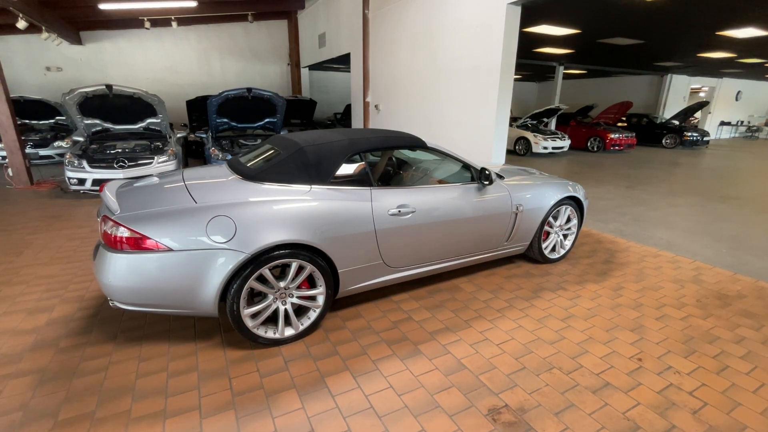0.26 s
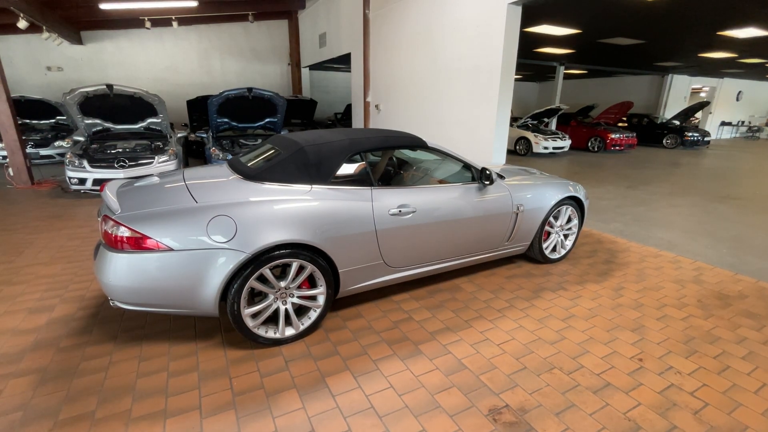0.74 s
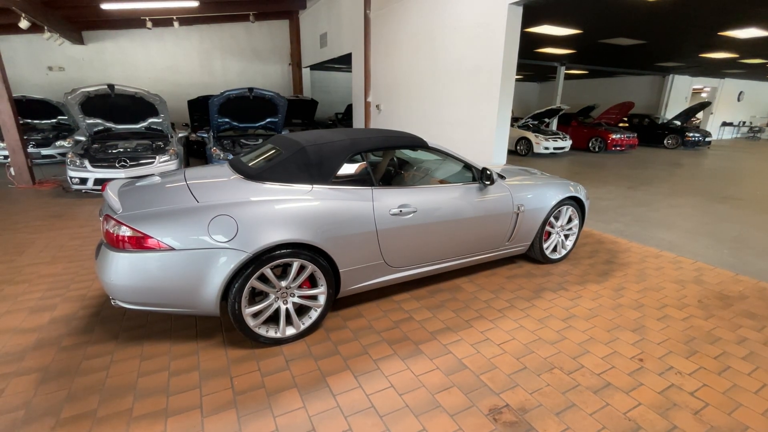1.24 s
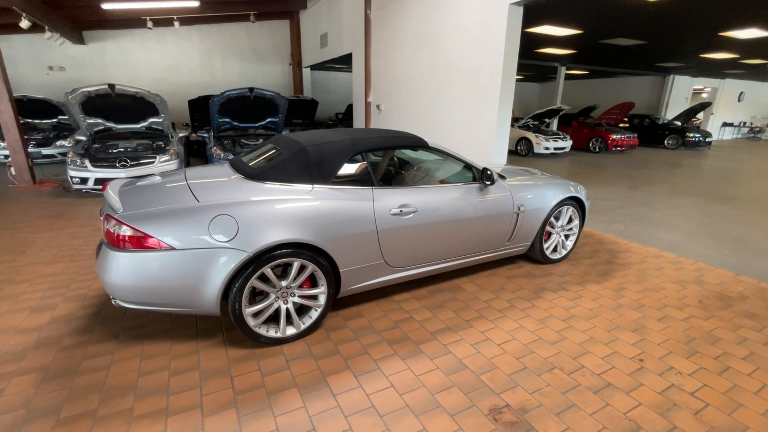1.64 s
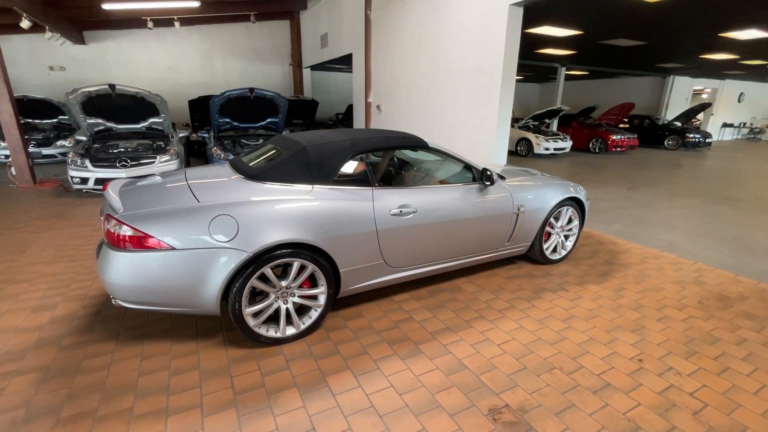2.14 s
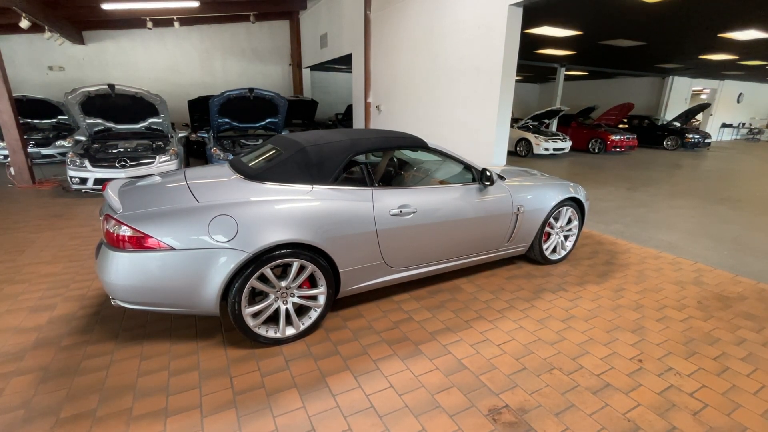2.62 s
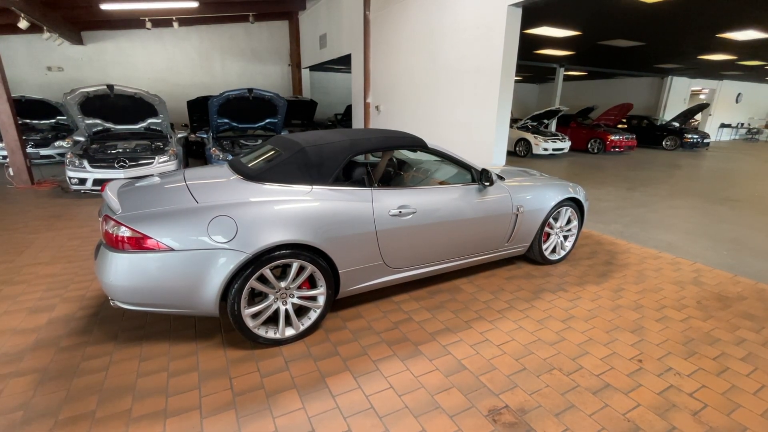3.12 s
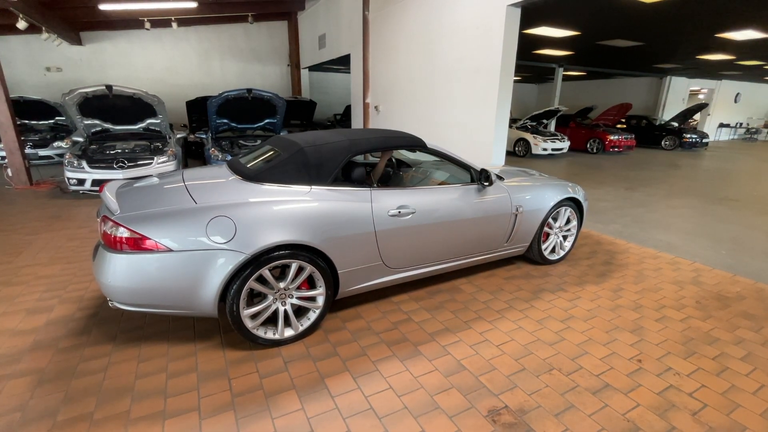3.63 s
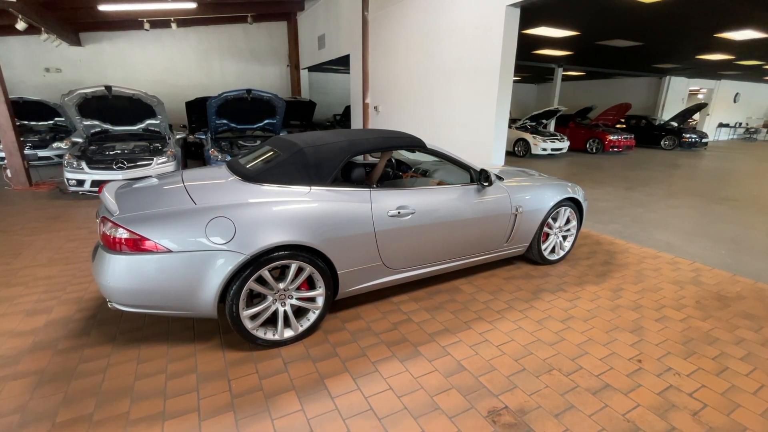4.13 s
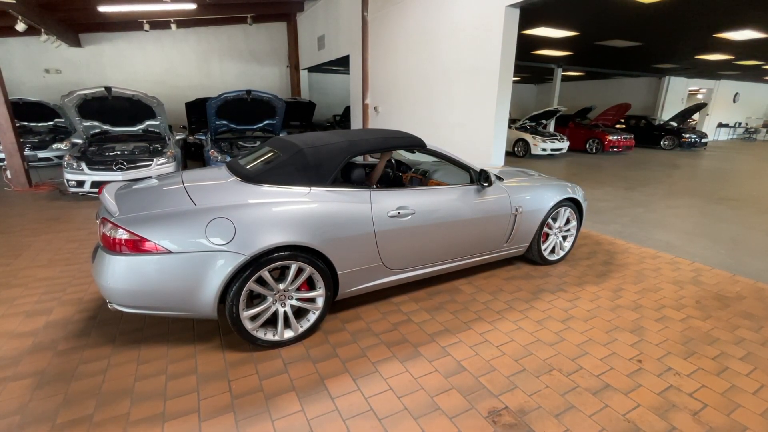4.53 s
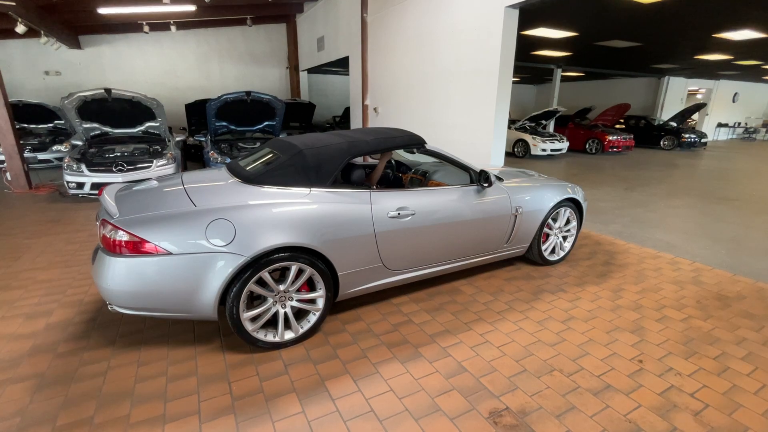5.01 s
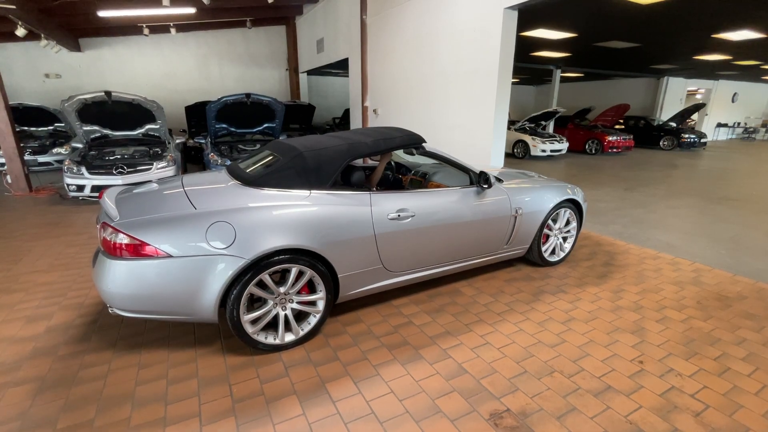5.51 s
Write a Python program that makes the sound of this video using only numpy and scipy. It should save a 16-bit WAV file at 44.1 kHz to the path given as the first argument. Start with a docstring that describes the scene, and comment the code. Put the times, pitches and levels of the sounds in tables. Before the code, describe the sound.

A convertible stands idling in a large reverberant showroom, picked up in stereo from a few metres away. From the start its eight-cylinder engine gives a deep droning, lumpy throb with fluttering exhaust puffs, while belts and pulleys whine in wavering spells. An electric roof motor hums low and steady with its octave, and a fuel pump sings thinly higher up. Soft padded knocks come near 1.8 s. From about 1.8 to 3 s the idle sinks gently and settles slower and more chugging, the main belt whine fading away. A dull metallic latch clunk with a quick rebound lands at about 2.5 s, among small rubs. More muffled knocks follow near 3.2, 3.8, 4.5 and 4.6 s, the one just before 3.9 s having a low thud. Short pulley chirps return around 2.8, 3.8 and 5.4 s. Airy fan rush and low hall rumble continue to the end at 5.8 s.

```python
"""In a large showroom a V8 convertible idles while its electric roof starts to fold.
The uneven idle throbs from firing orders and exhaust resonances, sinks at about two seconds and settles lower.
Belt-driven parts whine at fixed ratios to it; the roof motor hums with its octave and the fuel pump sings.
A latch clunks by ringing the roof frame, roof and windows knock softly as short noise bursts,
and behind them coloured noise gives the rush of air and the rumble of the hall, heard at two microphones."""
import sys
import numpy as np
from scipy import signal
from scipy.fft import rfft, irfft
from scipy.io import wavfile
from scipy.ndimage import uniform_filter1d

SR = 44100
rng = np.random.default_rng(int(sys.argv[2]) if len(sys.argv) > 2 else 0)


def digitize_waveform(pressure):
    """Quantize a signal to 16-bit integers and store it at the path in sys.argv[1].

    Rows of a 2-D input are taken as channels; values are limited to [-1, 1].
    """
    field = np.atleast_2d(pressure).T
    bounded = np.clip(field, -1, 1)
    quanta = np.round(bounded * 32767).astype(np.int16)
    wavfile.write(sys.argv[1], SR, quanta)


N = 254016
TIME = np.arange(N) / SR   # seconds
HZ = np.maximum(np.arange(N // 2 + 1) * SR / N, 1)   # frequencies of the spectrum


# How roughly the engine runs.
# Each row: time [s], gain of the throb, gas flutter and puffs [dB].
ROUGHNESS = [(0, 1.5), (0.8, -1), (1.4, 1.5), (1.9, 2), (2.6, 1.5), (3.3, 0), (4.3, -1.6), (4.9, -0.5),
             (5.5, 1.5), (5.76, 1)]


def engine(firings, rate, fast):
    """Firing orders, boom, cycle throb, puffs and gas flutter, with a chug when the idle is slow."""
    slow = 1 - fast
    first, second, third = firing_orders(firings, rate, fast)
    third_sway = lope(firings, once=0, twice=0.2 * fast, rough_db=0.4, late=0.14)
    chug = lope(firings, once=0.17 * slow ** 2, twice=0.25 * slow ** 2, rough_db=0.3, late=0.66)
    drone = first + third_sway * third + chug * (second + low_puff(slow))
    uneven = at_idle(fast, fast_db=-44, slow_db=-42) * throb(firings)
    roughness_db, = in_time(ROUGHNESS)
    rough = from_db(roughness_db) * (uneven + gas_flutter(firings, fast) + puffs(firings, fast))
    return drone + boom(firings, fast) + rough


# Drone of the exhaust, before the hall's standing waves.
# Each row: multiple of the firing rate, level at fast idle [dB], level at slow idle [dB].
DRONE = [(1, -42.5, -43.5), (2, -36, -41.5), (3, -35.5, -53)]


def firing_orders(firings, rate, fast):
    """Lines at whole multiples of the firing rate, lifted or cancelled by the hall as they glide."""
    orders = []
    for k, fast_db, slow_db in DRONE:
        order = round(k)
        level = at_idle(fast, fast_db, slow_db) * standing_waves(order * rate)
        orders.append(level * tone(order * firings, scatter=0.091, per_s=3.0))
    return orders


# Standing waves of the hall, which lift or cancel a drone line gliding through them.
# Each row: centre [Hz], half width [Hz], gain at the centre [dB].
STANDING_WAVES = [(45, 4.0, 13.5), (87, 1.2, -9), (127.4, 2.4, 13), (131.1, 2.8, 12.5), (140, 2.2, 4)]


def standing_waves(hz):
    """Gain of the hall for a low line at this pitch."""
    return from_db(sum(db * np.exp(-((hz - centre) / width) ** 2) for centre, width, db in STANDING_WAVES))


def boom(firings, fast):
    """The sixth firing order, favoured by the exhaust, beats in step with the engine cycle."""
    beats = lope(firings, once=0.5 * fast, twice=0.45, rough_db=0.6, late=0.96)
    level = at_idle(fast, fast_db=-35.5, slow_db=-51.5)
    return level * tone(6 * firings, scatter=0.19, per_s=1.3) * beats


def low_puff(slow):
    """Low noise through one resonance (centre and width in Hz), growing as the idle slows."""
    return from_db(-45) * slow * noise(np.abs(resonance(70.3, width_hz=28)) ** 2)


def throb(firings, size=4096, count=100):
    """Eight cylinders burn unevenly: a slowly changing pattern repeats each cycle and rings in the exhaust."""
    pattern = np.zeros(N)
    for share in (0.8, drift(1.72), drift(3.3)):
        harmonics = np.exp(2j * np.pi * rng.random(count))   # equal strength, random phase
        cycle = irfft(np.append(0, harmonics), size)
        pattern += share * np.interp(firings / 8, np.arange(size) / size, cycle, period=1)
    pattern /= np.sqrt(uniform_filter1d(pattern ** 2, size=SR // 5))   # even power over 0.2 s
    through_exhaust = irfft(rfft(pattern) * (exhaust_colour() + from_db(-19.0)), N)
    return rms_one(hall(through_exhaust, wet_db=-2.0))


# Strong exhaust puffs, before the roughness gain.
# Each row: place in the engine cycle [cycles], ring [Hz], level at fast idle [dB], level at slow idle [dB].
PUFFS = [(0.54, 282, -48.5, -45), (0.92, 282, -49.5, -46), (0.58, 141, -47.5, -49.5)]
PUFF_RING_S, PUFF_SPREAD_DB = 0.009, 1.5


def puffs(firings, fast):
    """At the same places in every cycle a stronger puff of gas sets the exhaust ringing briefly."""
    cycle, out = cycles(firings), 0
    for place, hz, fast_db, slow_db in PUFFS:
        last_puff_s = np.interp(np.floor(cycle - place) + place, cycle, TIME)
        age = TIME - last_puff_s
        envelope = age * np.exp(-age / PUFF_RING_S)
        ring = envelope * np.sin(2 * np.pi * (hz * age + rng.random()))
        varied = ring * from_db(PUFF_SPREAD_DB * drift(10.6))
        out = out + at_idle(fast, fast_db, slow_db) * rms_one(varied)
    return out


def gas_flutter(firings, fast):
    """Turbulent exhaust gas: noise in the exhaust's colour, swelling with the engine cycle."""
    swells = lope(firings, once=0.11 * fast, twice=0.13, rough_db=1.5)
    return at_idle(fast, fast_db=-43.0, slow_db=-45.5) * noise(exhaust_colour()) * swells


# Exhaust and body resonances.
# Each row: centre [Hz], width of a single pass [Hz], gain [dB].
EXHAUST = [(66, 22, -8.5), (138.3, 36, -0.5), (281.3, 27, 0.5), (343, 157, -12.5)]


def exhaust_colour():
    """The exhaust's resonances, each applied twice so the valleys stay dark."""
    return sum(from_db(db) * np.abs(resonance(hz, width)) ** 2 for hz, width, db in EXHAUST)


def lope(firings, once, twice, rough_db, late=0):
    """Swells once and twice per cycle, as the two banks take uneven turns, no two alike; rms 1; late in cycles."""
    angle = 2 * np.pi * (cycles(firings) - late)
    swell = np.exp(once * np.cos(angle) + twice * np.cos(2 * angle))
    return rms_one(swell * from_db(rough_db * drift(21)))


FIRST_THROB_S = 0.053   # the engine cycle first swells here


def cycles(firings):
    """Engine cycles, of eight firings each, since the first throb."""
    return (firings - np.interp(FIRST_THROB_S, TIME, firings)) / 8


def at_idle(fast, fast_db, slow_db):
    """A gain that moves from its slow-idle to its fast-idle level with engine speed."""
    return from_db(slow_db + (fast_db - slow_db) * fast)


PULLEY_RATIO = 3.622   # mean pulley turns per firing
BELT_SLIP = 0.0025   # wavering of the pulley's speed (share)


def belt(firings, fast):
    """Pulleys and gears whine at fixed ratios to the crank; one slips, whines and sings out in spells."""
    pulley = unsteady(PULLEY_RATIO * firings, BELT_SLIP, per_s=14.4)
    return engine_overtones(firings, fast) + pulley_whine(pulley) + pulley_spells(pulley)


# Whines locked to the engine.
# Each row: multiple of the firing rate, level at fast idle [dB], level at slow idle [dB],
# wavering share, speed of the wavering [Hz].
OVERTONES = [(3.97, -54, -54, 0.45, 3.9), (5, -54.5, -63, 0.73, 3.1), (6.605, -64, -45.5, 0.59, 4.2),
             (6.955, -67, -51.5, 0.66, 8.4), (7.24, -50.5, -60.5, 0.44, 5.1), (8.48, -56.5, -47, 0.33, 2.1),
             (14.52, -61, -64, 1, 5), (25.6, -66, -59.5, 1, 15), (36.35, -55.5, -64, 1.1, 13),
             (52.2, -64.5, -70, 1.6, 22), (76.9, -60.5, -62, 2.2, 54)]


def engine_overtones(firings, fast):
    """Lines at fixed, mostly uneven multiples of the firing rate sink in pitch with the idle."""
    out = 0
    for k, fast_db, slow_db, scatter, blur_hz in OVERTONES:
        out = out + at_idle(fast, fast_db, slow_db) * tone(k * firings, scatter, per_s=blur_hz)
    return out


# The slipping pulley's main whine, which fades as the idle sinks.
# Each row: time [s], level [dB].
WHINE = [(0, -57), (0.33, -57), (0.42, -49), (1.12, -47.5), (1.2, -57), (1.3, -49), (1.52, -53),
         (1.63, -49.5), (1.78, -56), (1.92, -49), (2.14, -50), (2.22, -60), (3, -74)]


def pulley_whine(pulley):
    """The sixth overtone of the slipping pulley's turning rate."""
    whine_db, = in_time(WHINE)
    return from_db(whine_db) * tone(6 * pulley, scatter=0.36, per_s=18)


# Spells in which the pulley's other overtones sing.
# Each row: start [s], length [s], multiple of its turning rate, level [dB], wavering share.
SPELLS = [(0.0, 0.48, 2, -44, .5), (0.5, 1.2, 4, -55, .5), (0.4, 1.05, 10, -57, 1.8),
          (0.76, 0.18, 10, -53, 0.9), (1.2, 0.64, 2, -44, 0.58), (1.55, 0.28, 8, -54, 0.62),
          (2.72, 0.18, 7, -50, .4), (3.72, .28, 7, -52, 0.44), (4.999, 0.3, 7, -58, .5),
          (5.38, 0.17, 7, -50, .3)]
SPELL_FADE_S = 0.074


def pulley_spells(pulley):
    """Overtones of the pulley fade in and out, halfway up at the start and end of each spell."""
    out = 0
    for start, length, k, db, scatter in SPELLS:
        inside_s = np.minimum(TIME - start, start + length - TIME)
        swell = np.clip(0.5 + inside_s / SPELL_FADE_S, 0, 1)
        out = out + from_db(db) * swell * tone(round(k) * pulley, scatter, per_s=28)
    return out


# Roof motor.
# Each row: time [s], hum [Hz], level of the hum [dB], level of its octave [dB].
ROOF_MOTOR = [(0, 157, -49, -42.5), (1.3, 156.2, -45, -51.5), (2.7, 156, -42.5, -49),
              (4, 156.3, -47.5, -69), (5.76, 153.5, -47.5, -43.5)]


def roof_motor():
    """A hum and its octave, sagging slightly as the load grows."""
    hz, hum_db, octave_db = in_time(ROOF_MOTOR)
    turns = np.cumsum(hz) / SR
    hum = from_db(hum_db) * tone(turns, scatter=0.16, per_s=3.2)
    octave = from_db(octave_db) * tone(2 * turns, scatter=1.0, per_s=5.2)
    return hum + octave


# Overtones of the fuel pump.
# Each row: multiple of its turning rate, level [dB], wavering share.
PUMP = [(2, -49.5, 0.92), (4, -51, 0.51), (5, -59.5, 0.67), (6, -70.5, .6)]
PUMP_HZ, PUMP_SLIP = 384.35, 0.0028   # mean turns per second, wavering of the speed (share)


def fuel_pump():
    """A rough whine of unsteady speed, wavering in the hall."""
    turns = unsteady(PUMP_HZ * TIME, PUMP_SLIP, per_s=11.5)
    return sum(from_db(db) * tone(round(k) * turns, scatter, per_s=19) for k, db, scatter in PUMP)


# Contacts of the roof latch. Each row: time [s], level before the mode's own gain [dB].
LATCH = [(2.472, -39), (2.477, -34.5), (2.491, -43)]
# Modes of the roof frame. Each row: pitch [Hz], gain [dB], time to die away by 60 dB [s].
FRAME = [(476, -3, 0.1), (560, -1, 0.083), (680, -3, .05), (825, -1, .045), (1028, -11, .06),
         (1400, -12, .04), (2180, -12, .04)]


def latch():
    """The roof latch lets go with a clunk and a rebound; each contact rings the frame."""
    out = np.zeros(N)
    for s, db in LATCH:
        age = np.maximum(TIME - s, 0)
        for hz, mode_db, t60 in FRAME:
            strike_db = db + mode_db + rng.normal(0, 1)
            decay = from_db(strike_db - 60 * age / t60)
            out += rng.choice([-1, 1]) * decay * np.sin(2 * np.pi * hz * age)
    return hall(out, wet_db=-6)


# Soft knocks and rubs of roof and windows.
# Each row: time of the peak [s], level at the peak [dB], centre [Hz], time constant of the decay [s].
KNOCKS = [(1.833, -42, 220, 0.072), (1.865, -41.5, 470, 0.047), (2.307, -44, 1047, .022),
          (2.445, -43, 650, .04), (2.549, -47, 880, .04), (2.607, -46, 680, .022), (3.162, -40, 689, .024),
          (3.793, -45.5, 1807, 0.033), (3.876, -36, 94, 0.088), (3.882, -42, 610, .02),
          (4.449, -44, 596, 0.051), (4.594, -42, 600, .04)]


def knocks():
    """Padded contacts, bursts of resonant noise, swell quickly and die away in the hall."""
    out = np.zeros(N)
    for s, db, hz, length in KNOCKS:
        age = TIME - s
        envelope = np.exp(-np.abs(age) / np.where(age < 0, 0.3 * length, length))
        colour = np.abs(resonance(hz, 0.55 * hz)) ** 2
        body = irfft(rfft(rng.standard_normal(N)) * colour, N)
        out += from_db(db) * envelope * rms_one(body)
    return hall(out, wet_db=-4)


# Colour of the fan rush, then of the hall's rumble; only the shape counts, the levels are below.
# Each row: frequency [Hz], relative level per Hz [dB].
RUSH_COLOUR = [(400, -72), (700, -70.5), (1000, -72.5), (1250, -75.5), (1550, -73.5), (1850, -79.5),
               (2300, -79.5), (3200, -81.5), (4000, -90), (5200, -88), (8200, -93), (10900, -90.5),
               (11800, -102), (12600, -111)]
RUMBLE_COLOUR = [(20, -26), (35, -6), (60, 0.5), (110, -10.5), (200, -7), (330, -11.5), (480, -20),
                 (900, -46)]
RUSH_DB, RUMBLE_DB = -40.5, -44


def air():
    """Fan rush, with its lows cut, and the low rumble of the hall."""
    low_cut = 1 / np.sqrt(1 + (370 / HZ) ** 8)
    rush = noise(from_db(over_hz(RUSH_COLOUR)) * reflections(strength=0.08) * low_cut)
    easing_db = 0.63 * (1 - TIME / TIME[-1] * 2)   # eases off slowly
    flutter_db = 0.47 * drift(9.2)
    rumble = noise(from_db(over_hz(RUMBLE_COLOUR)))
    return from_db(RUSH_DB + easing_db + flutter_db) * rush + from_db(RUMBLE_DB) * rumble


def reflections(strength, count=8):
    """Floor, pillar and car bodies return short echoes that ripple the colour, differently at each microphone."""
    delays_s = rng.uniform(0.002, 0.018, (count, 2, 1))
    return 1 + strength * sum(np.exp(-2j * np.pi * HZ * delay) for delay in delays_s)


HALL_T60_S = 1.27   # time for the tail to fall by 60 dB


def hall(x, wet_db):
    """Add a diffuse tail of decaying noise, different at each microphone."""
    tail = rng.standard_normal((2, N)) * from_db(-60 * TIME / HALL_T60_S)
    tail /= np.sqrt(np.sum(tail ** 2, axis=1, keepdims=True))
    return x + from_db(wet_db) * irfft(rfft(x) * rfft(tail), N)


# The stereo image of noise at the microphones.
# Each row: frequency [Hz], then left-right likeness [0-1], left minus right [dB] or lead of the left [radians].
LIKENESS = [(60, 0.9), (150, 0.83), (300, 0.87), (450, 0.35), (800, 0.49), (1200, 0.28), (1550, 0.61),
            (2000, 0.17), (2700, 0.51), (4000, 0.21), (6500, 0.37), (8500, 0.21), (10000, 1), (12000, 0.99)]
BALANCE = [(100, -3), (400, 3.5), (600, 1), (1000, 3), (1400, -1), (1750, -0.5), (2100, -7), (2600, -2),
           (3000, 0.2), (3900, 0.5), (5000, 4.5), (6000, 8), (7500, 3.5), (8500, -0.5), (11000, 0)]
LEAD = [(20, 0), (1900, -0.08), (2670, 3), (3100, 3), (4200, 6.5), (5000, 10.5), (6300, 11.5), (7200, 12.5),
        (8180, 14), (9730, 10), (10500, 8.5), (11700, 6.5)]


def noise(response):
    """Stereo noise of a given colour: a shared part offset in phase, and a diffuse part; rms 1."""
    shared, *diffuse = rfft(rng.standard_normal((3, N)))
    alike = np.clip(over_hz(LIKENESS), 0, 1)
    sides = np.array([[1], [-1]])   # left, right
    direct = np.sqrt(alike) * shared * np.exp(0.5j * sides * over_hz(LEAD))
    both = direct + np.sqrt(1 - alike) * np.array(diffuse)
    balance = from_db(sides * over_hz(BALANCE) / 2)
    return rms_one(irfft(both * response * balance, N))


def tone(turns, scatter, per_s):
    """A line of rms 1; reflections in the hall add a wavering share, different at each microphone."""
    phase = 2 * np.pi * (turns + rng.random())
    sine, cosine = np.sin(phase), np.cos(phase)
    sides = [(1 + scatter * drift(per_s)) * sine + scatter * drift(per_s) * cosine for side in range(2)]
    return rms_one(np.array(sides))


def unsteady(turns, slip, per_s):
    """Turns of a shaft whose speed wavers by a small share."""
    return np.cumsum(np.gradient(turns) * (1 + slip * drift(per_s)))


def drift(per_s):
    """Smooth random wandering with spread 1, made at a hundredth of the sample rate."""
    r = np.exp(-200 * np.pi * per_s / SR)
    chance = rng.standard_normal(N // 100 + 1002)
    slow = signal.lfilter([1], [1, -2 * r, r * r], chance)[1000:]   # drop the filter's start
    return np.interp(np.arange(N) / 100, np.arange(len(slow)), rms_one(slow))


def resonance(hz, width_hz):
    """Response of one resonance, 1 on top."""
    return 1 / (1 + 1j * (HZ ** 2 - hz ** 2) / (HZ * width_hz))


def from_db(db):
    """Decibels to gain."""
    return 10 ** (np.asarray(db) / 20)


def rms_one(x):
    """Scale to rms 1."""
    return x / np.sqrt(np.mean(x ** 2) + 1e-20)


def in_time(rows):
    """Each column of a curve table at every sample."""
    s, *columns = np.transpose(rows)
    return [np.interp(TIME, s, c) for c in columns]


def over_hz(points):
    """A table of (Hz, value) at every frequency, joined along a logarithmic scale."""
    hz, value = np.transpose(points)
    return np.interp(np.log(HZ), np.log(hz), value)


# Engine speed, sinking at about two seconds.
# Each row: time [s], firing rate [firings per second].
IDLE = [(0, 46.35), (0.3, 46.84), (0.55, 46.24), (0.85, 46.45), (1.75, 45.59), (2.1, 44.33), (2.4, 43.38),
        (2.95, 41.1), (3.4, 41.1), (3.9, 41.44), (4.5, 41.3), (5.1, 41.58), (5.76, 42.03)]


def scene():
    """The engine and its belt follow one speed; roof, pump and air sound beside them."""
    rate, = in_time(IDLE)
    firings = np.cumsum(rate) / SR
    fast = (rate - rate.min()) / np.ptp(rate)   # 1 at fast idle, 0 at slow idle
    car = engine(firings, rate, fast) + belt(firings, fast) + roof_motor() + fuel_pump()
    return car + latch() + knocks() + air()


def record(dry):
    """The top is cut steeply above 12.7 kHz."""
    steep_cut = signal.ellip(10, 0.2, 80, 12700, fs=SR, output="sos")
    return signal.sosfilt(steep_cut, dry)


dry = scene()
out = record(dry)
digitize_waveform(out)
```